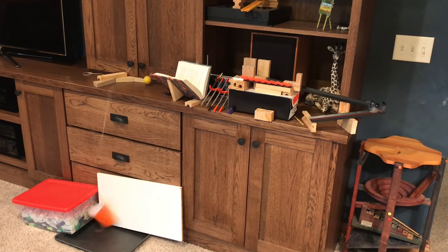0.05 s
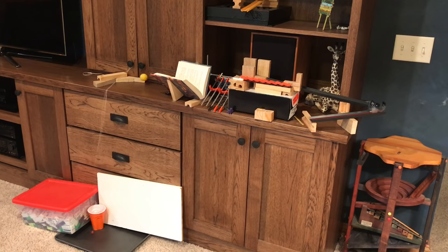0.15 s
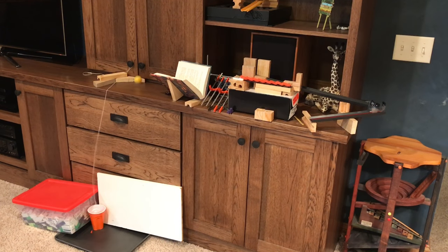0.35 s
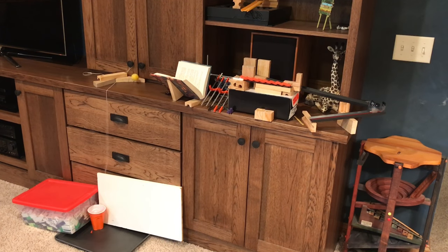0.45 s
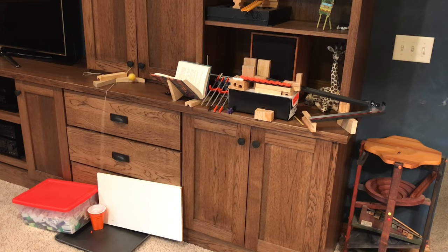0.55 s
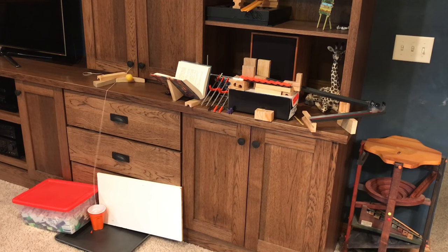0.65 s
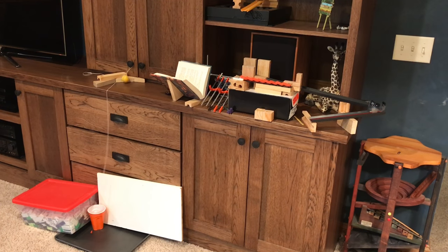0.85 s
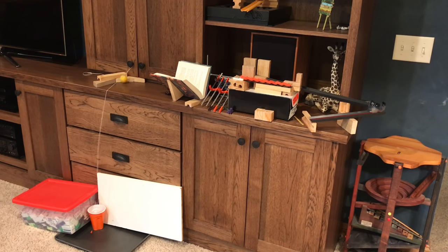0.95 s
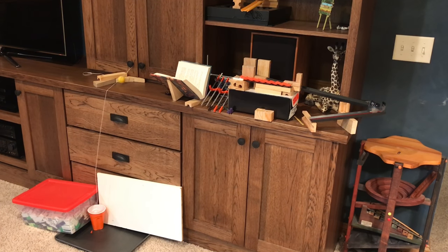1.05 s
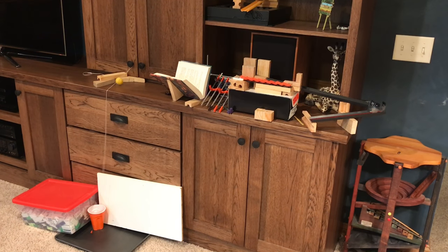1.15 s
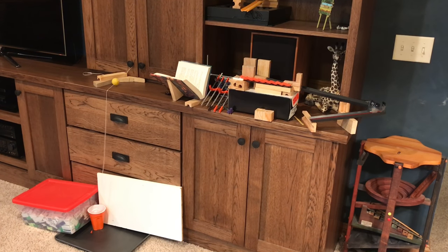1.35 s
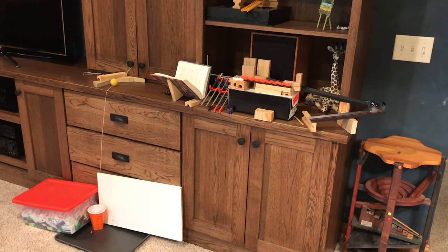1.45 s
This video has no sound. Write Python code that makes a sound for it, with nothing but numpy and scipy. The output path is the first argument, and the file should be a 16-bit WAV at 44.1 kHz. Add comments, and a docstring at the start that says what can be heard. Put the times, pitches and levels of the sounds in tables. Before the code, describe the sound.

A small hard ball bounces on wooden rails with bright clicks that come faster and grow softer. Near the start, a plastic cup clacks against a board and lands with a loud thump and rattle in a quiet living room.

```python
"""Chain-reaction toy in a living room

A small hard ball bounces on wooden rails on a cabinet, faster and faster. Each bounce
is a bright ping and a dull knock of the wood. Meanwhile a falling plastic cup clacks
against a board, then lands with a thump and a rattle that make the furniture boom.
The room adds a short echo and a quiet background noise."""
import sys
import numpy as np
from scipy import signal
from scipy.fft import rfft, irfft
from scipy.io import wavfile
from scipy.ndimage import uniform_filter1d

SR = 44100
rng = np.random.default_rng(int(sys.argv[2]) if len(sys.argv) > 2 else 0)


def persist_wave(psi):
    """Save psi, clipped to +-1, as 16-bit WAV."""
    counts = np.round(np.clip(psi, -1, 1) * 32767).astype(np.int16)
    wavfile.write(sys.argv[1], SR, np.atleast_2d(counts).T)


N = 66150
T = np.arange(N) / SR

# Levels are relative. A mode is a tone that a thing rings at; t60 is its time to fade by 60 dB.
# Ball bounces: t/s, ping level/dB, knock level/dB, knock top f/Hz, snap level/dB, snap f/Hz,
# then one level/dB for each of the four groups of ping modes
BALL_BOUNCES = [(0.0306, -21.5, -36.5, 1570, -46, 2430, 0, -4, 0.5, -5.5),
                (0.1904, -25.5, -35.5, 1860, -44, 3100, 8, -17, 2, -4),
                (0.3388, -20.5, -37, 1850, -44.5, 3120, -1, -4, 1, -14),
                (0.48, -25, -38.5, 1510, -47.5, 2540, 5.5, -5, 3, -9.5),
                (0.6103, -21.5, -35.5, 2096, -45, 3340, 4.5, -5.5, -4.5, -12),
                (0.7346, -21.5, -38, 1896, -48.5, 2940, -3, 3, 5, -7.5),
                (0.8452, -41, -58, 1880, -57, 3760, 6, -4, 3, -11.5),
                (0.8502, -25, -38.5, 1980, -44, 3730, 4, -3, -0.5, -8),
                (0.947, -27.5, -38.5, 2070, -48, 3330, -6, 2, 2, -10),
                (1.0374, -30.5, -40.5, 1790, -51.5, 4140, 4.5, 9, 8.5, -5.5),
                (1.1219, -26, -41, 1810, -51, 3040, 0, 1.5, -5, -11),
                (1.1994, -30, -41.5, 1920, -51.5, 3050, 1.5, 2.5, 0.5, -9),
                (1.2700, -36.5, -42, 1830, -52.5, 2970, 4, 2, 0.5, -8),
                (1.3359, -31, -43, 1890, -54, 4420, -3.5, 1, -3, -5),
                (1.3950, -28.5, -44, 1825, -53.5, 2930, -7, -4, -2, -16),
                (1.4500, -32.5, -44.5, 1800, -54.5, 3000, -2.5, 0, -1.5, -11)]
# Modes of the ping: f/Hz, level/dB, swell time/s
PING_MODES = [(8940, -6.5, 0.00054), (10080, -9.5, 0.0012), (11185, -8.5, 0.0012), (11800, -9, 0.00049),
              (13000, 0.5, .0005), (13600, -8, .0005), (14400, -13, .0004)]
# The group (0 to 3) of each ping mode
PING_MODE_GROUPS = [0, 1, 2, 2, 3, 3, 3]
# Tone colour of the rail's knock and of its snap: f/Hz, level/dB
KNOCK_SPECTRUM = [(150, -11), (330, -7.5), (480, -6), (620, -6.5), (900, -0.5), (1400, -0.5), (2000, -3),
                  (4500, -11)]
SNAP_SPECTRUM = [(1200, -12.5), (2000, -9), (2550, -5), (3300, -2.5), (4100, -10.5), (5200, -17.5),
                 (7000, -13), (16000, -15)]
# Modes of the cabinet: f/Hz, level/dB
CABINET_MODES = [(445, -2), (490, -0.5), (515, 0), (684, 0.5), (856, 0), (899, 1), (982, 2.5),
                 (1118, -12.5), (1148, 2), (1262, -16), (1314, -8.5), (1356, -1.5), (1437, -5.5),
                 (1620, -3)]
# The cup hits the board, then rattles on a mat: t/s, level/dB, treble tilt/(dB per octave), rise/s, t60/s
BOARD_HITS = [(0.1113, -3, -0.5, 0.00025, 0.025), (.1150, -1, -1.5, 0.00044, 0.0069),
              (.1601, -2.5, -4.5, 0.0015, 0.033)]
MAT_HITS = [(.1974, -3, -4, 0.00048, 0.042), (.2052, 4.5, 0, 0.0011, 0.012),
            (.2066, 12.5, -1.5, 0.0013, 0.011), (.2122, 0.5, -2, 0.00062, 0.022),
            (.2286, 3.5, -2, 0.001, 0.043)]
# Tone colour of those hits: f/Hz, level/dB
BOARD_HIT_SPECTRUM = [(200, -8.5), (550, 6), (800, 3), (1300, 2.5), (2500, 0.5), (3700, -2), (5000, 0),
                      (7000, 2), (9000, -6.5), (11000, -4.5), (13000, -3), (16000, -11)]
MAT_HIT_SPECTRUM = [(200, -7), (430, 4), (700, -8), (1100, 3.5), (1600, -3.5), (2100, -1.5), (2550, -6),
                    (3300, -2), (4500, -1.5), (6100, -2.5), (7500, -11.5), (12000, -14), (16000, -22)]
# Modes that ring after those hits: f/Hz, level/dB, t60/s
BOARD_HIT_MODES = [(603, -3, .06), (1666, -6, 0.063), (2568, -6, .06), (4374, 5.5, .065), (5750, -4, .08),
                   (6635, -4.5, 0.097), (8830, -0.5, 0.042), (12730, 1, .06)]
MAT_HIT_MODES = [(428, 9.5, .07), (872.6, 6, 0.11), (1106, -15, 0.14), (1230, -6.5, 0.088),
                 (2046, -12.5, .16), (2800, -10, .13), (3240, 4, .16), (3610, -1.5, .18),
                 (3790, -12.5, 0.168), (4515, -8, 0.178), (5230, -7.5, 0.074), (5530, -11, 0.11)]
# Low thumps as the cup swings, lands and rocks: middle t/s, level/dB, f/Hz, width/s
CUP_THUMPS = [(0.071, -29.5, 107.5, 0.0033), (.2105, -17, 419.5, .005), (0.2151, -7.5, 197, 0.0036),
              (0.304, -27, 195, 0.0073), (.339, -31, 187, 0.0083)]
# Low modes of the furniture: f/Hz, level/dB, t60/s
FURNITURE_MODES = [(141, -24, 0.34), (163.7, -20.5, .28), (216, -43, 1.46), (226.5, -20, 0.4),
                   (261.4, -26.5, 0.42), (290.7, -22, 0.31), (371.8, -29, 0.18), (399.8, -27, 0.18),
                   (627, -32, 0.27)]
# How long the room echoes: f/Hz, t60/s
ROOM_DECAY = [(150, 0.37), (500, 0.31), (1200, 0.36), (2500, 0.27), (5000, .24), (10000, .26),
              (16000, 0.14)]
# Tone colour of the steady room noise and of the low rumble: f/Hz, level/dB
NOISE_SPECTRUM = [(20, -8), (40, -16.5), (58, 14), (85, -11), (200, -2), (500, -9), (1200, -8),
                  (2300, -25.5), (5000, -28.5), (10000, -20), (16000, -24.5)]
RUMBLE_SPECTRUM = [(20, -25.5), (50, 4), (75, -1), (140, -4.5), (300, -14), (800, -16), (2000, -30.5),
                   (4500, -38.5), (8000, -41), (16000, -55)]
# Loudness of the rumble as the cup falls: t/s, level/dB
RUMBLE_LOUDNESS = [(0, -38.5), (.07, -41.5), (.15, -47.5), (.26, -40), (.35, -54), (.6, -66.5)]


def ball_pings(gain_db=10.5):
    """Each bounce sets off short, high modes in a different mix, and one faint longer tone."""
    pings = np.zeros(N)
    for start, ping_db, _, _, _, _, *group_db in BALL_BOUNCES:
        level_db = gain_db + ping_db
        for (hz, mode_db, swell_s), group in zip(PING_MODES, PING_MODE_GROUPS):
            detuned_hz = hz * (1 + .007 * rng.standard_normal())
            add(pings, start, amp(level_db + mode_db + group_db[group]) * blip(detuned_hz, swell_s))
        long_tone = unit(ring([(9000, 0, .2)]))
        add(pings, start, amp(level_db + group_db[0] - 26.5) * long_tone)
    return pings + amp(-10) * room_echo(pings)


def wood_knocks(knock_gain_db=23, snap_gain_db=21):
    """The rail knocks and snaps at each bounce, and the cabinet rings under it."""
    rail, cabinet = np.zeros((2, N))
    full_knock = unit(colour(burst(t60=.054, rise_s=.0025), KNOCK_SPECTRUM))
    wood_ring = unit(ring([(hz, db, .22) for hz, db in CABINET_MODES])) * swell(.0023)
    for start, _, knock_db, top_hz, snap_db, snap_hz, *_ in BALL_BOUNCES:
        # A shorter contact lets more treble through, so the knock is brighter.
        lowpass = signal.butter(10, top_hz, fs=SR, output="sos")
        knock = unit(signal.sosfilt(lowpass, full_knock))
        snap_noise = unit(colour(burst(t60=.014, rise_s=.00073, passes=1), SNAP_SPECTRUM))
        snap = snap_noise + amp(-4.5) * blip(snap_hz, swell_s=.00028)
        add(rail, start, amp(knock_gain_db + knock_db) * knock + amp(snap_gain_db + snap_db) * snap)
        add(cabinet, start, amp(knock_gain_db + knock_db - .5) * wood_ring)
    return rail + cabinet + amp(-2.5) * room_echo(rail)


def cup_hits(hits, spectrum, modes, ring_db, echo_db):
    """The cup's thin plastic shell clacks and rings briefly at every contact."""
    clacks, rings = np.zeros((2, N))
    for start, db, tilt_db, rise_s, t60 in hits:
        clack = unit(colour(burst(t60, rise_s), spectrum, tilt_db))
        add(clacks, start, amp(db) * clack)
        add(rings, start, amp(db + ring_db) * unit(ring(modes)))
    return clacks + rings + amp(echo_db) * room_echo(clacks)


def cup_thumps(landing_s=.2062):
    """The cup's weight gives short low thumps, and the furniture booms on after it lands."""
    thumps = np.zeros(N)
    for middle, db, hz, width_s in CUP_THUMPS:
        t = T - middle
        envelope = np.exp(-.5 * (t / width_s) ** 2)
        thumps += amp(db) * envelope * np.sin(2 * np.pi * hz * t)
    add(thumps, landing_s, ring(FURNITURE_MODES) * swell(.0033))
    return thumps


def room_echo(sound, late_t60=.97):
    """The room's echo: each pitch dies at its own speed, over a faint, slower tail."""
    hz, t, noise = signal.stft(rng.standard_normal(N), SR, nperseg=256)
    early = amp(-60 * t / look_up(ROOM_DECAY, hz)[:, None])
    late_db = -23 - .5 * np.log2(1 + hz[:, None] / 3000)
    late = amp(late_db - 60 * t / late_t60)
    tail = signal.istft(noise * np.hypot(early, late), SR, nperseg=256)[1][:N]
    return signal.fftconvolve(sound, unit(tail * swell(.001)))[:N]


def background():
    """Quiet room noise, and a low rumble that dies down once the cup has landed."""
    noise = unit(colour(rng.standard_normal(N), NOISE_SPECTRUM)) * np.sqrt(N)
    rumble = unit(colour(rng.standard_normal(N), RUMBLE_SPECTRUM)) * np.sqrt(N)
    rumble_db = np.interp(T, *np.transpose(RUMBLE_LOUDNESS))
    return amp(-62) * noise + amp(rumble_db) * rumble


def blip(hz, swell_s):
    """A very short tone that grows for swell_s seconds and then dies."""
    t = T[:SR // 40]
    tone = t * np.exp(-t / swell_s) * np.sin(2 * np.pi * (hz * t + rng.random()))
    return np.pad(unit(tone), (0, N - len(t)))


def ring(modes):
    """One fading tone for each mode, each starting at a random point of its wave."""
    return sum(amp(db) * fade(t60) * np.sin(2 * np.pi * (hz * T + rng.random())) for hz, db, t60 in modes)


def burst(t60, rise_s, passes=6):
    """A noisy vibration that swells and dies, about equally strong at all pitches."""
    envelope = fade(t60) * swell(rise_s)
    noise = rng.standard_normal(N) * envelope
    for _ in range(passes):
        # Even out the pitches, then restore the swell and fade.
        spectrum = rfft(noise)
        noise = irfft(spectrum / (abs(spectrum) + 1e-12), N)
        loudness = np.sqrt(abs(uniform_filter1d(noise ** 2, size=48)) + 1e-16)
        noise = noise * envelope / loudness
    return unit(noise)


def colour(sound, spectrum, tilt_db=0, size=4096):
    """Gives a sound a tone colour, tilted by tilt_db per octave around roughly 3 kHz."""
    hz = abs(np.fft.fftfreq(size, 1 / SR))
    gain = amp(look_up(spectrum, hz) + tilt_db * np.log2((hz + 200) / 3000))
    # This kind of filter (minimum phase) makes no sound ahead of a hit.
    response = np.exp(np.conj(signal.hilbert(np.log(gain))))
    taps = np.fft.ifft(response).real
    return signal.fftconvolve(sound, taps[:size // 2])[:N]


def swell(rise_s):
    """Rises from 0 towards 1, about two thirds of the way in rise_s seconds."""
    return 1 - np.exp(-T / rise_s)


def fade(t60):
    """Falls by 60 dB in t60 seconds."""
    return amp(-60 * T / t60)


def amp(db):
    """Turns decibels into a number to multiply by."""
    return 10 ** (np.asarray(db) / 20)


def unit(sound):
    """Scales a sound to a total energy of 1."""
    return sound / np.sqrt(np.sum(sound ** 2) + 1e-20)


def look_up(table, hz):
    """Reads between a table's rows, with octaves evenly spaced."""
    table_hz, values = np.transpose(table)
    return np.interp(np.log(hz + 1), np.log(table_hz), values)


def add(mix, start, sound):
    """Mixes a sound in, beginning at start seconds."""
    part = mix[max(round(start * SR), 0):][:len(sound)]
    part += sound[:len(part)]


def scene():
    """Ball, cup and background together in one channel."""
    clacks = cup_hits(BOARD_HITS, BOARD_HIT_SPECTRUM, BOARD_HIT_MODES, ring_db=-8, echo_db=-4)
    rattle = cup_hits(MAT_HITS, MAT_HIT_SPECTRUM, MAT_HIT_MODES, ring_db=-10, echo_db=-7)
    return (ball_pings() + wood_knocks() + clacks + rattle + cup_thumps() + background())[None]


def record(dry, bottom_hz=42, ceiling=.85, top_hz=16100):
    """Cuts the deepest bass, rounds off the loudest peaks and cuts the highest treble."""
    sound = signal.sosfilt(signal.butter(4, bottom_hz, "highpass", fs=SR, output="sos"), dry)
    rounded = sound / (1 + (sound / ceiling) ** 6) ** (1 / 6)
    lowpass = signal.firwin(201, top_hz, window=("kaiser", 9), fs=SR)
    return signal.oaconvolve(rounded, lowpass[None], "same")


dry = scene()
out = record(dry)
persist_wave(out)
```